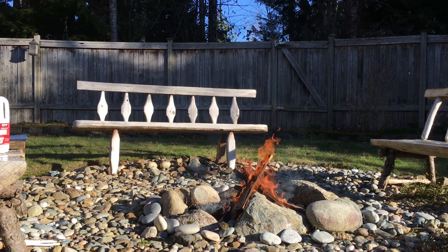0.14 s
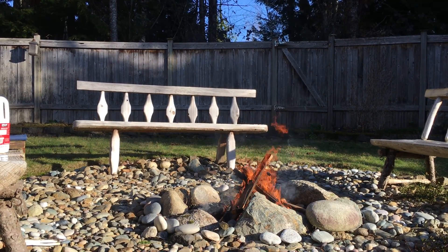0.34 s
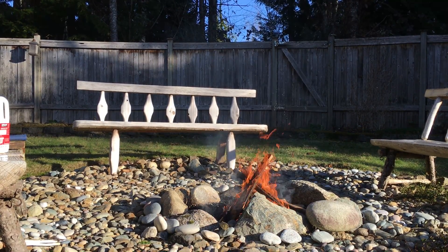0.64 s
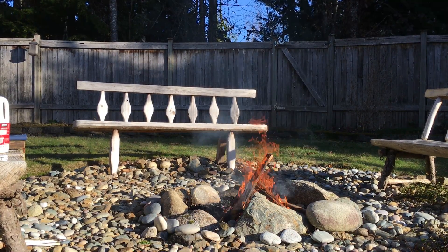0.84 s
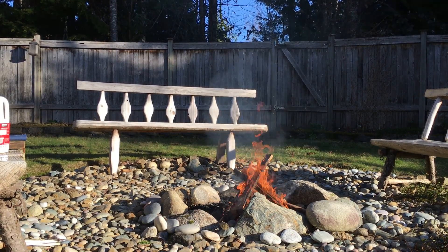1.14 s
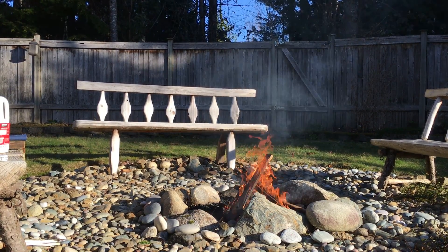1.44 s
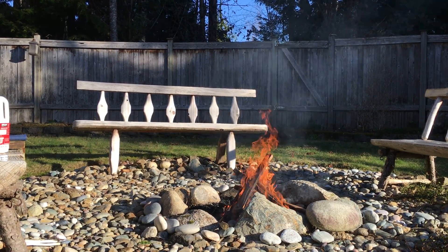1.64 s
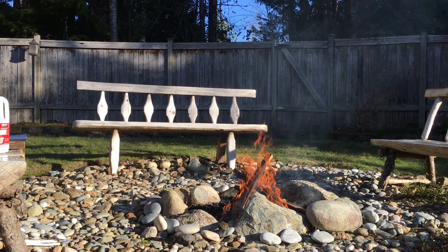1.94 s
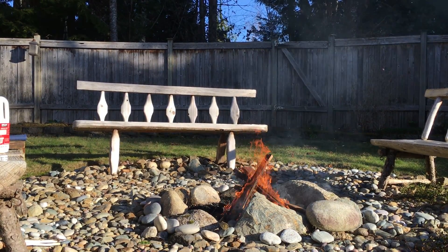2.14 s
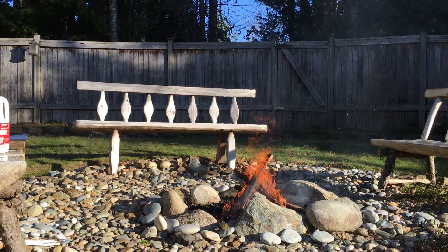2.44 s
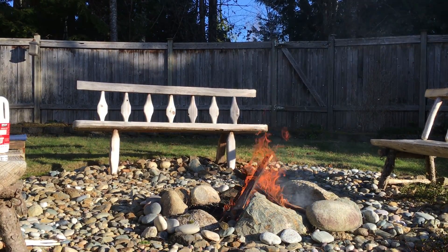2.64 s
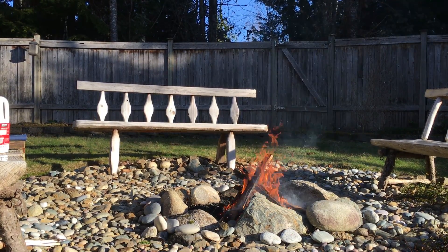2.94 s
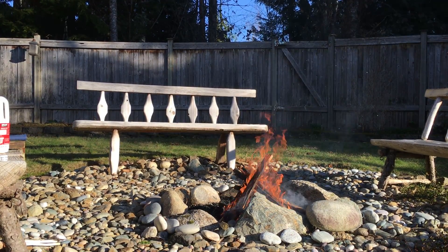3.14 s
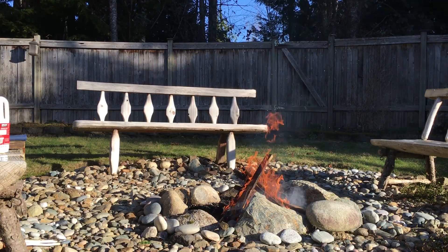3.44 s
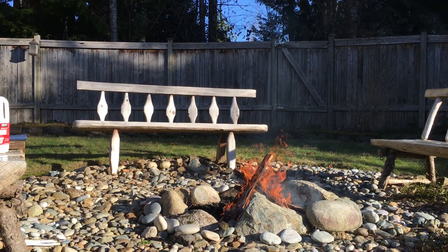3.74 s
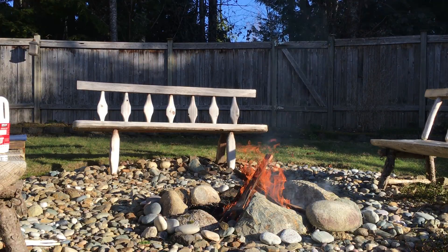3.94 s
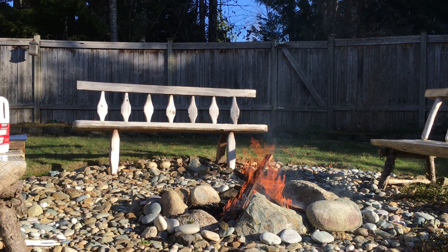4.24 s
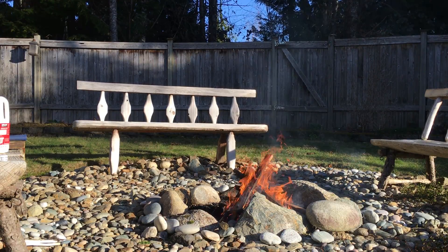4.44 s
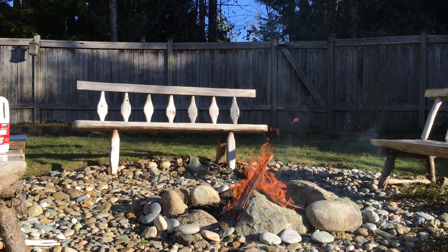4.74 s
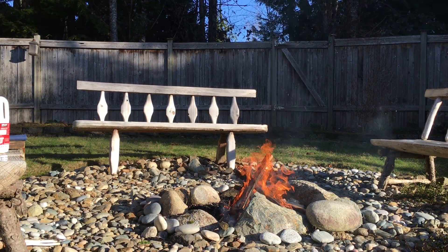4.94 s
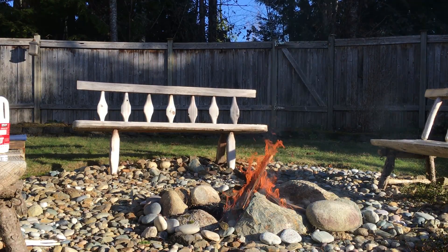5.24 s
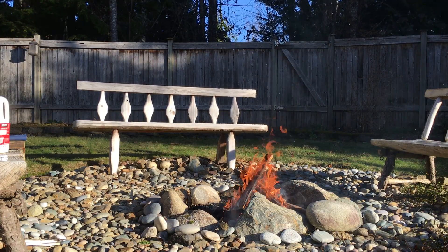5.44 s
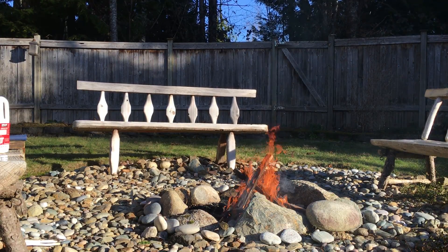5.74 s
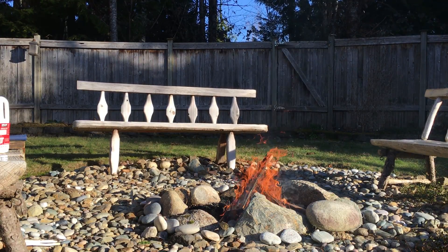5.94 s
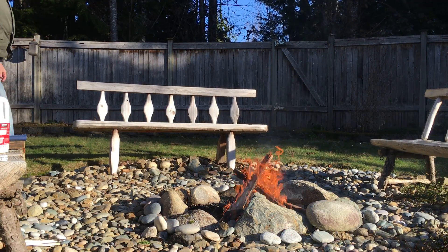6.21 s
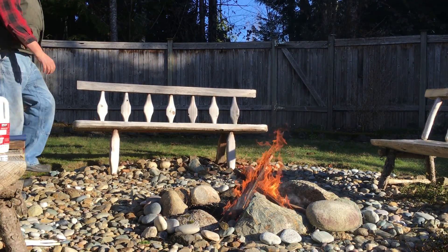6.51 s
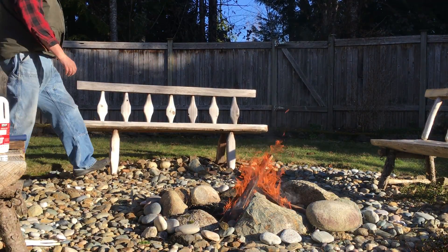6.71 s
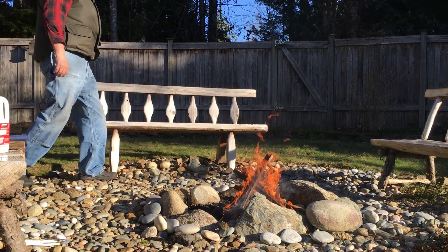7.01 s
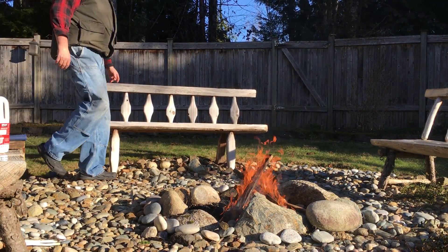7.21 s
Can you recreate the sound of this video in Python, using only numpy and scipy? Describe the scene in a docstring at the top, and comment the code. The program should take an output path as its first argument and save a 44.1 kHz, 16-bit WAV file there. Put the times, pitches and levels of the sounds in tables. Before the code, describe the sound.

In a fenced yard, irregular steam pops from burning logs stand out sharply over a quiet low rumble of breeze and flames. Some are hard and bright, others weak and woody, each followed by a quick blurred echo. Tiny ember ticks come between them. A few muted footfalls with slight pebble clicks are heard near the start, then again near the end. The microphone stays fixed, a few metres away.

```python
"""Small wood fire in a yard

A small wood fire crackles in a ring of stones in a fenced yard, a few metres from the microphone.
Steam pops are short random snaps, spread by the stones, echoed by the fence and fading among the trees.
Small ticks fill the gaps, and two of the strong pops come with a low thump, as of gas.
Someone takes a few steps over grass and pebbles (shaped noise and short rings), over a low noise rumble."""
import sys
import numpy as np
from scipy import signal
from scipy.fft import rfft, irfft
from scipy.io import wavfile
from scipy.ndimage import uniform_filter1d

SR = 44100
rng = np.random.default_rng(int(sys.argv[2]) if len(sys.argv) > 2 else 0)


def unload_wav(signal):
    """Save mono or channel-first audio to the path in sys.argv[1] as 16-bit WAV at rate SR, clipped to [-1, 1]."""
    wavfile.write(
        sys.argv[1],
        SR,
        np.round(np.clip(np.atleast_2d(signal).T, -1, 1) * 32767).astype(np.int16),
    )


N = 325017  # length of the scene in samples
HZ = np.fft.rfftfreq(2048, 1 / SR)  # frequencies at which sound colours are drawn


def amp(db):
    """Turns decibels into a gain."""
    return 10 ** (np.asarray(db) / 20)


def unit(x):
    """Scales a sound to energy 1."""
    return x / np.sqrt(np.sum(x ** 2) + 1e-20)


def read(points, hz):
    """Reads a table of (frequency, value) between its points, on a log-frequency axis."""
    f, value = np.transpose(points)
    return np.interp(np.log(hz + 1), np.log(f + 1), value)


def add(mix, s, sound):
    """Mixes a sound in at time s, in seconds."""
    part = mix[max(round(s * SR), 0):][:len(sound)]
    part += sound[:len(part)]


def causal(db):
    """Makes the most compact pulse that starts at once and has this spectrum; its energy is 1."""
    log_gain = np.log(amp(np.maximum(db, db.max() - 80)))
    circle = np.r_[log_gain, log_gain[-2:0:-1]]
    # the Hilbert transform finds the phase that packs the energy at the start
    spectrum = np.exp(np.conj(signal.hilbert(circle)))
    return unit(np.fft.ifft(spectrum).real[:len(db)])


def hump(centre_hz, width):
    """Draws a broad resonance, 1 at its centre; the width is a share of the pitch."""
    return 1 / (1 + ((HZ / centre_hz - 1) / width) ** 2)


def wash(colour, patchy_db):
    """Makes noise of rms 1 with this colour, swelling in slow patches of time and pitch."""
    hz, t, z = signal.stft(rng.standard_normal(N), SR, nperseg=8192, noverlap=7168)
    patches = uniform_filter1d(rng.standard_normal(z.shape), size=40, axis=0)
    patches = uniform_filter1d(patches, size=8, axis=1)
    z = z * amp(read(colour, hz)[:, None] + patchy_db * patches / patches.std())
    sound = signal.istft(z, SR, nperseg=8192, noverlap=7168)[1][:N]
    return sound / sound.std()


# slow level of the low rumble, before the rumble_db lift: (time [s], level [dB])
RUMBLE_LEVEL = [(0.0, -52.5), (2.79, -49), (2.99, -56), (3.31, -48), (4.65, -49.5), (6.08, -50.5),
                (7.3, -48)]
# colour of the rumble: (frequency [Hz], relative level per Hz [dB])
RUMBLE_SPECTRUM = [(20, -44), (31, -22), (43, -0.5), (58, 0.5), (75, -3), (90, 1.5), (130, -12), (220, -30),
                   (600, -72)]
# colour of the steady outdoor background: (frequency [Hz], relative level per Hz [dB])
AIR_SPECTRUM = [(40, -23.5), (110, -2.5), (190, 0), (350, -8.5), (500, -16.5), (900, -22), (1500, -31),
                (3000, -38.5), (9000, -41), (15500, -43)]
AIR_DB = -54.5  # rms level of that background
# typical size of the random level flutter [dB], time between its points [s]
FLUTTER_DB, FLUTTER_S = 1.9, 0.08


def air(rumble_db=2.5):
    """Low rumble of flames and breeze: noise whose level flutters, over steady far surroundings."""
    t = np.arange(N) / SR
    flutter = np.interp(t / FLUTTER_S, np.arange(400), rng.standard_normal(400))
    level_db = np.interp(t, *np.transpose(RUMBLE_LEVEL)) + FLUTTER_DB * flutter
    rumble = amp(level_db + rumble_db) * wash(RUMBLE_SPECTRUM, patchy_db=-2.0)
    surroundings = amp(AIR_DB) * wash(AIR_SPECTRUM, patchy_db=1.5)
    return rumble + surroundings


# how fast the yard falls silent: (frequency [Hz], time to fall by 60 dB [s])
YARD_DECAY = [(400, 0.34), (1300, 0.94), (3500, 0.8), (8000, 0.56), (15000, 0.47)]
# colour of the yard: (frequency [Hz], relative level [dB])
YARD_SPECTRUM = [(200, 7), (1200, -2), (4000, -1), (9000, -0.5), (15000, -4)]
YARD_FRAME = 256  # samples per slice


def yard(onset=0.0095, lumpy_db=1.0, grain_db=1.0):
    """Blurred return from fence and trees: uneven noise in which each pitch dies at its own speed."""
    noise, grains = rng.standard_normal((2, SR * 3 // 4))
    grains = uniform_filter1d(grains, size=60)
    grainy = noise * amp(grain_db * grains / grains.std())
    hz, t, z = signal.stft(grainy, SR, nperseg=YARD_FRAME)
    lumps = uniform_filter1d(rng.standard_normal(z.shape), size=30, axis=0, mode="wrap")
    z = z * amp(read(YARD_SPECTRUM, hz)[:, None] + lumpy_db * lumps / lumps.std())
    fading = z / 1000 ** (t / read(YARD_DECAY, hz)[:, None])
    tail = signal.istft(fading, SR, nperseg=YARD_FRAME)[1]
    build_up = 1 - np.exp(-(np.arange(len(tail)) / SR / onset) ** 2)
    return unit(tail * build_up)


# pebbles knocked together underfoot: (time [s], level [dB], middle pitch [Hz])
PEBBLE_KNOCKS = [(.989, -43.5, 1405), (1.0, -39.5, 1160), (1.648, -45.5, 885), (6.872, -56, 3650),
                 (6.895, -57, 2968), (6.926, -55, 2594), (6.94, -51, 1707), (7.123, -47, 2090),
                 (7.142, -53, 3830)]


def pebbles(decay=0.00073, rattle=0.0035, spread=0.4, count=14):
    """Each knock is a quick rattle of stones, every one with its own short ring."""
    out = np.zeros(N)
    t = np.arange(SR // 40) / SR
    envelope = np.exp(-t / decay) * (1 - np.exp(-t / 0.0004))
    for s, db, hz in PEBBLE_KNOCKS:
        for when, pitch in zip(rng.random(count), rng.standard_normal(count)):
            # pitches scatter by "spread" octaves, moments within "rattle" seconds
            ring = np.sin(2 * np.pi * hz * 2 ** (spread * pitch) * t) * envelope
            add(out, s + rattle * when, amp(db) * np.sqrt(SR / 1000 / count) * unit(ring))
    return out


# heel and sole contacts: (time [s], length [s], thud level [dB], crunch level [dB])
CONTACTS = [(0.182, 0.024, -36, -42), (0.217, 0.028, -38.5, -43.5), (0.38, 0.019, -44.5, -65),
            (0.939, 0.076, -59, -65), (.985, 0.048, -49, -53), (1.585, 0.022, -45.5, -66),
            (1.638, 0.045, -50.5, -60.5), (6.147, 0.0077, -40.5, -54), (6.182, 0.014, -43, -53),
            (6.325, 0.018, -51, -64), (6.918, .031, -47, -59), (7.111, 0.012, -49.5, -52)]
# colour of a foot on soil: (frequency [Hz], relative level per Hz [dB])
THUD_SPECTRUM = [(60, -21.5), (190, -3), (350, 1.5), (450, -5), (650, -18.5), (1000, -20), (3000, -52)]
# colour of a foot on pebbles: (frequency [Hz], relative level per Hz [dB])
CRUNCH_SPECTRUM = [(250, -14.5), (500, -2.5), (700, -3.5), (900, -2), (1200, -2), (1500, -11.5), (2000, -6),
                   (2900, -19), (5000, -18.5), (12000, -34)]
STEP_ATTACK_S = 0.005  # time for the weight to come on
GRINDS_PER_S = 1800  # average rate of tiny pebble contacts


def footsteps(grain_db=0.5, release=0.025, wet_db=-11.5):
    """Each contact thuds on the soil and grinds pebbles together while the weight comes down."""
    out = pebbles()
    t = np.arange(SR // 5) / SR
    for s, length, thud_db, crunch_db in CONTACTS:
        weight = np.minimum(t / STEP_ATTACK_S, 1) * np.exp(-np.maximum(t - 0.56 * length, 0) / release)
        soil, grit = rng.standard_normal((2, len(t))) * weight
        # sparse grains of uneven strength
        grit = grit * (rng.random(len(t)) < GRINDS_PER_S / SR)
        grit = grit * amp(grain_db * np.minimum(rng.exponential(1, len(t)), 3))
        for force, spectrum, db in (soil, THUD_SPECTRUM, thud_db), (grit, CRUNCH_SPECTRUM, crunch_db):
            sound = unit(signal.fftconvolve(force, causal(read(spectrum, HZ))))
            add(out, s, amp(db) * np.sqrt(length * SR) * sound)
    return out + amp(wet_db) * signal.fftconvolve(out, yard())[:N]


def splutter(decay, size=512):
    """Makes a short dying rush of random spikes, evened out to a broadly flat spectrum."""
    rush = rng.standard_normal(size) * np.exp(-np.arange(size) / SR / decay)
    z = rfft(rush, 4 * size)
    power = uniform_filter1d(abs(z) ** 2, size=140, mode="mirror")
    flatten = causal(-10 * np.log10(power + 1e-9))
    return unit(signal.fftconvolve(irfft(z)[:size], flatten)[:size])


def stones(reach=0.017, decay=0.0074, edge=0.0016):
    """Dense scatter from the stone ring and the pebble bed; it ends where the pebbles do."""
    t = np.arange(SR // 30) / SR
    build_up = 1 - np.exp(-(t / 0.0015) ** 2)
    shape = build_up * np.exp(-t / decay) / (1 + np.exp((t - reach) / edge))
    return unit(rng.standard_normal(len(t)) * shape)


# echoes from ground, benches and fence; the level holds for a stone scatter of -9.5 dB:
# (delay [s], level [dB], share by which it follows the stone scatter [dB per dB])
SINGLE_ECHOES = [(.0028, -14, 0.57), (0.0106, -19, 0.058), (0.0134, -21.5, 0.083), (0.021, -26.5, 0.84),
                 (.0345, -23, .4), (.0375, -24.5, 0.51), (.077, -29.5, 0.82)]


def crack(near_colour, far_colour, stones_db, yard_db, snap=0.00038, smear=0.0015):
    """One fracture as it arrives: direct snap, stone scatter, single echoes and the yard."""
    path = np.zeros(SR // 8)
    add(path, 0, splutter(snap))
    add(path, 0, amp(stones_db) * stones())
    for delay, db, share in SINGLE_ECHOES:
        # a crack that faces away has stronger echoes, and late echoes are more smeared
        echo = splutter(snap + smear * min(delay / 0.015, 1))
        add(path, delay, amp(db + share * (stones_db + 9.5)) * echo)
    sound = amp(yard_db) * signal.fftconvolve(yard(), causal(far_colour))
    add(sound, 0, signal.fftconvolve(path, causal(near_colour)))
    return np.sqrt(SR / 1000) * sound  # energy 1 becomes that of 1 ms at rms 1


def tick(centre_hz, skirt_db=0.5):
    """A tiny fracture: a broad hump of sound around one pitch."""
    octaves = np.log2((HZ + 50) / centre_hz)
    colour = -skirt_db * np.minimum(octaves ** 2, 3 * abs(octaves))
    return crack(colour, colour, stones_db=-6.5, yard_db=-11.5, snap=0.0001)


# clear ticks of the embers: (time [s], level [dB])
CLEAR_TICKS = [(0.166, -39.5), (0.696, -34), (1.0698, -48), (1.293, -45.5), (1.375, -44), (1.4601, -43.5),
               (1.7996, -45), (1.907, -47.5), (2.6414, -46.5), (2.8004, -45), (2.829, -47.5), (2.9271, -40),
               (3.5098, -48), (4.0823, -46), (4.2777, -49.5), (4.9354, -40.5), (4.9977, -46), (5.237, -42),
               (5.2973, -41.5), (5.3348, -39), (5.7817, -46), (6.0786, -46), (6.6929, -61), (7.0974, -53)]
TICK_HZ = 6500  # middle pitch of the clear ticks


def embers(faint_db=-61.5, spread_db=3.5, count=90):
    """Tiny fractures in the embers: the clear ticks, and many faint ones at random moments."""
    out = np.zeros(N)
    for s, db in CLEAR_TICKS:
        add(out, s, amp(db) * tick(TICK_HZ))
    for when, size, pitch in rng.random((count, 3)):
        level_db = faint_db - spread_db * np.log(size + 0.02)  # a few are much louder than the rest
        add(out, when * N / SR, amp(level_db) * tick(5000 * 2 ** pitch))
    return out


# low thumps, as of gas, with two of the strong pops:
# (time [s], level before it dies away [dB], pitch [Hz])
GAS_THUMPS = [(2.9487, -23.5, 122.5), (3.534, -32.5, 183.5)]
THUMP_DECAY_S = 0.0045


def thumps():
    """A push as of gas: a low swing of the air that dies within about two cycles."""
    out = np.zeros(N)
    t = np.arange(SR // 10) / SR
    for s, db, hz in GAS_THUMPS:
        add(out, s, -amp(db) * np.sin(2 * np.pi * hz * t) * np.exp(-t / THUMP_DECAY_S))
    return out


# steam pops in the logs: (time [s], level [dB], woody body [dB], sizzle [dB],
# pitch of the splinter's ring [Hz], scatter off the stones [dB])
STEAM_POPS = [(0.019, -14, -9.5, 0.5, 6200, -1), (0.25, -20, 3.5, 1, 1490, -5.5),
              (0.4696, -11.5, -8, -7, 3910, -5.5), (1.2227, -37.5, 0.5, -4.5, 7700, 4),
              (1.4279, -40.5, 5.5, -26, 3940, 3), (1.5032, -31, -1.5, -5, 7200, -.5),
              (1.9755, -12, -4.5, -1, 4070, 7), (2.315, -15.5, -3, -5.5, 8130, -1),
              (2.6742, -18, -7, 2.5, 9170, -7.5), (2.9494, -12.5, -2, -8, 3470, 1),
              (2.9705, -20.5, -4.5, -16.5, 7400, -0.5), (3.5326, -16, -7.5, -1, 13100, 0.5),
              (3.684, -12, 1.5, -3.5, 6660, -11.5), (3.78, -33.5, 4, -6, 1050, -6.5),
              (4.2611, -33.5, -0.5, -0.5, 2570, -16), (4.536, -26.5, -2, -11.5, 1035, -26.5),
              (5.0546, -36, 0.5, 1, 11900, -9.5), (5.1143, -8.5, 1.5, 3.5, 9000, -19),
              (5.408, -32, -12, 4, 13870, -12), (5.6124, -34, 6, 0.5, 9430, -13.5),
              (5.8222, -13.5, -3, -0.5, 12100, -8), (6.2, -11, -8.5, 1.5, 14200, -14),
              (6.4924, -31.5, -1, -4.5, 3550, -10.5), (6.993, -40.5, -9, -3, 3730, -24)]
# points at which the colour of a pop is set, from deep to bright: (frequency [Hz])
POP_COLOUR_HZ = [20, 150, 500, 1000, 2400, 5700, 12500, 16000]
# the ring: level of a full pop [dB], ring height in it [dB], growth per dB of weakness, width / pitch
FULL_POP_DB, RING_DB, RING_PER_DB, RING_WIDTH = -12.5, 5, 0.15, 0.11
# the yard answers more loudly to a pop that faces away, towards the stones
YARD_DB, YARD_PER_SCATTER = -11, 0.6


def pops(knock_db=-5.0, knock_per_db=0.17, dip_db=-1.0, bass_db=-2.5, sub_db=-31.0, top_db=-3.0,
         far_ring_db=2.0):
    """Steam pockets split the wood: a snap with body and sizzle, and the brief ring of a splinter."""
    out = np.zeros(N)
    for s, db, body, sizzle, ring_hz, stones_db in STEAM_POPS:
        weakness = FULL_POP_DB - db  # weak pops knock and ring more, strong ones are nearly all snap
        low = body + knock_db + knock_per_db * weakness
        levels = [low + sub_db, low + bass_db, low + dip_db, low, body, 0, sizzle, sizzle + top_db]
        colour = read(list(zip(POP_COLOUR_HZ, levels)), HZ)
        ring = hump(ring_hz, RING_WIDTH)
        near = colour + (RING_DB + RING_PER_DB * weakness) * ring
        far = colour + far_ring_db * ring
        yard_db = YARD_DB + YARD_PER_SCATTER * stones_db
        add(out, s, amp(db) * crack(near, far, stones_db, yard_db))
    return out


def scene():
    """Background, steps and fire at one microphone."""
    return (air() + footsteps() + embers() + thumps() + pops())[None]


EDGE_HZ = 15850  # upper limit of the sound


def record(dry):
    """Rounds off the sharpest peaks, then removes what lies above the band limit."""
    rounded = dry / (1 + (dry / 0.72) ** 6) ** (1 / 6)
    low_pass = signal.firwin(255, EDGE_HZ, window=("kaiser", 9), fs=SR)
    return signal.oaconvolve(rounded, low_pass[None], "same")


dry = scene()
out = record(dry)
unload_wav(out)
```